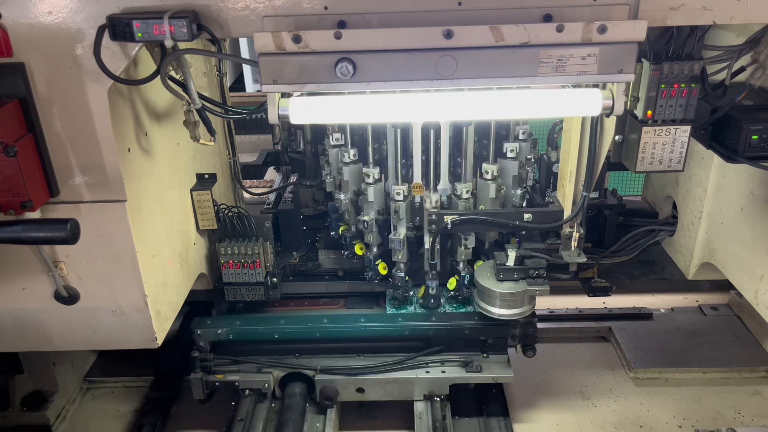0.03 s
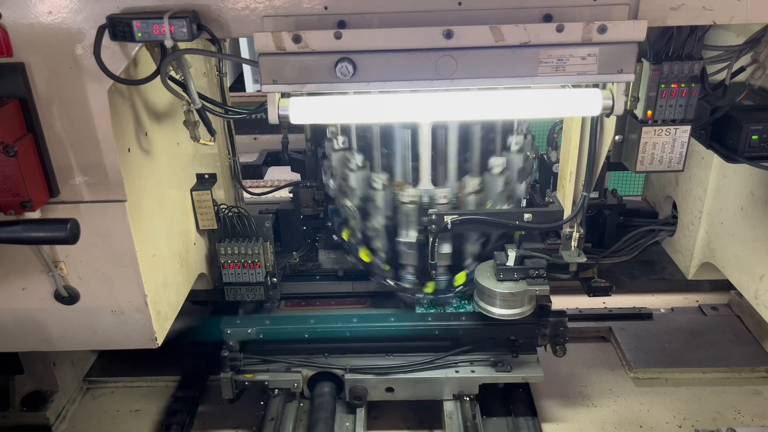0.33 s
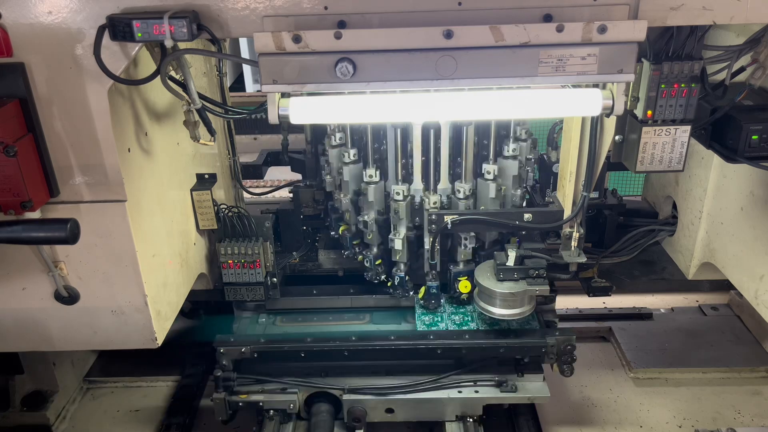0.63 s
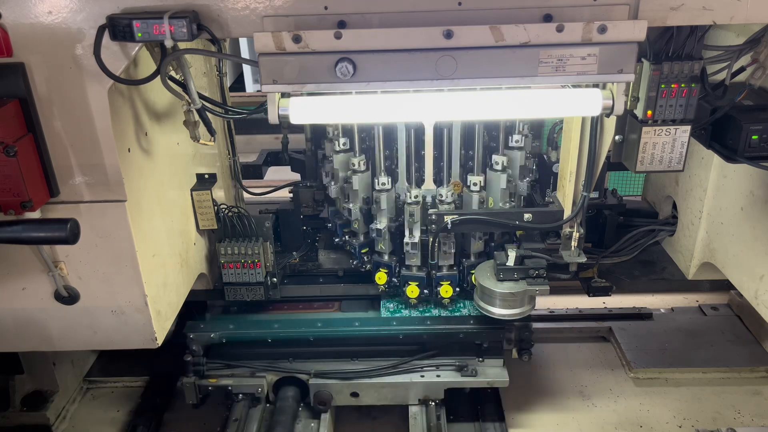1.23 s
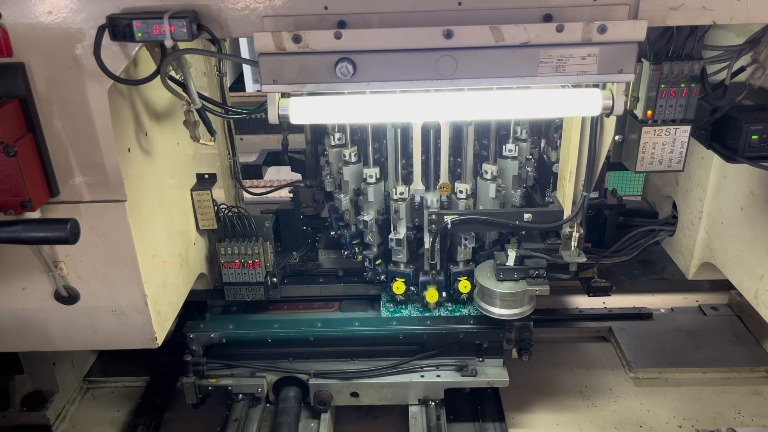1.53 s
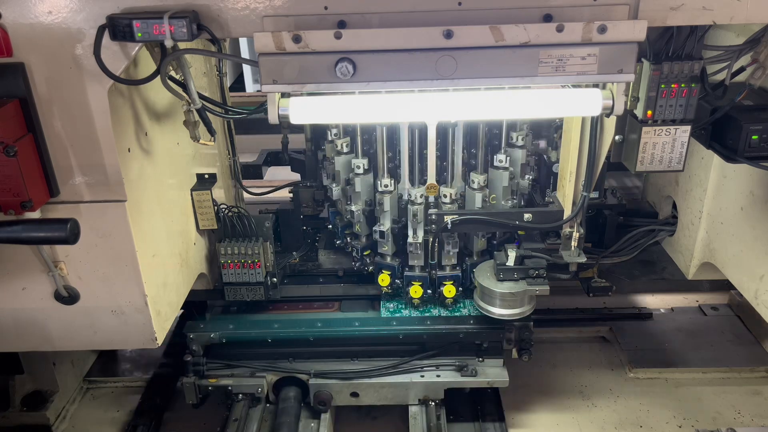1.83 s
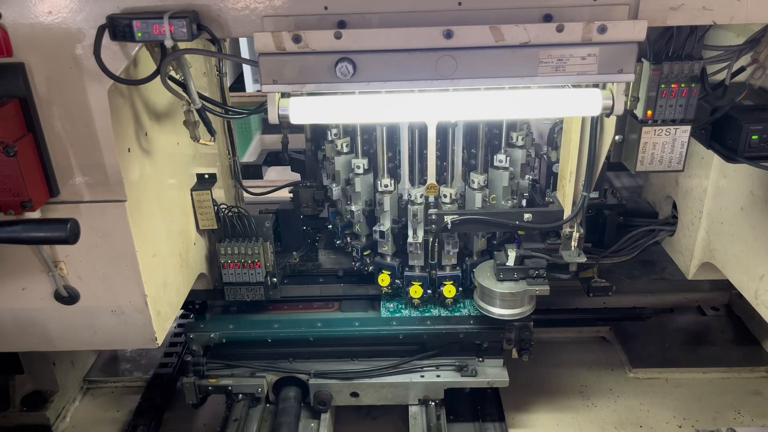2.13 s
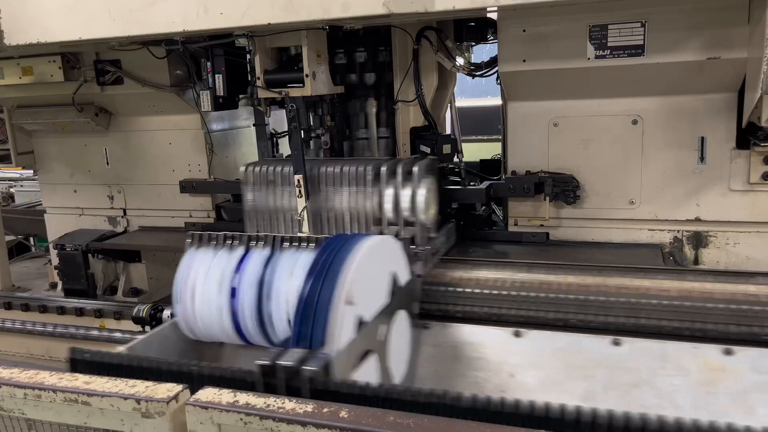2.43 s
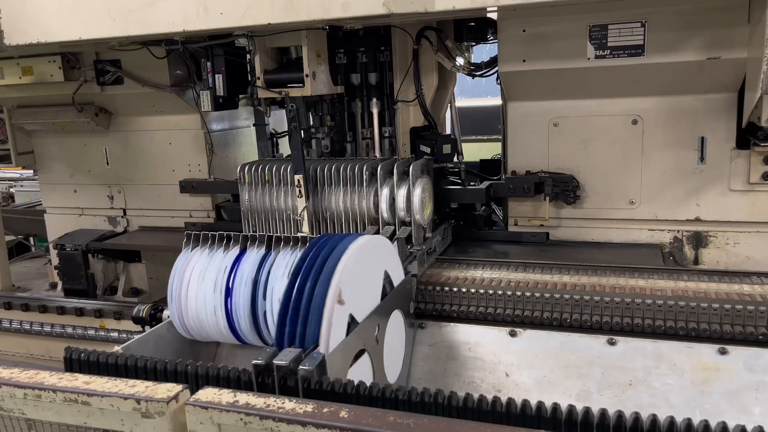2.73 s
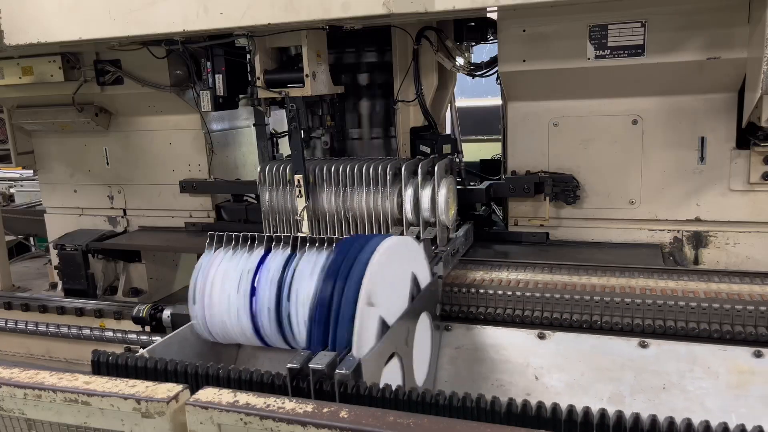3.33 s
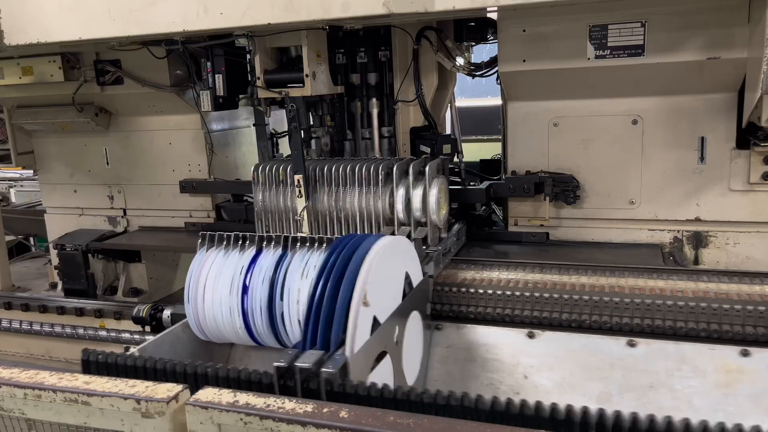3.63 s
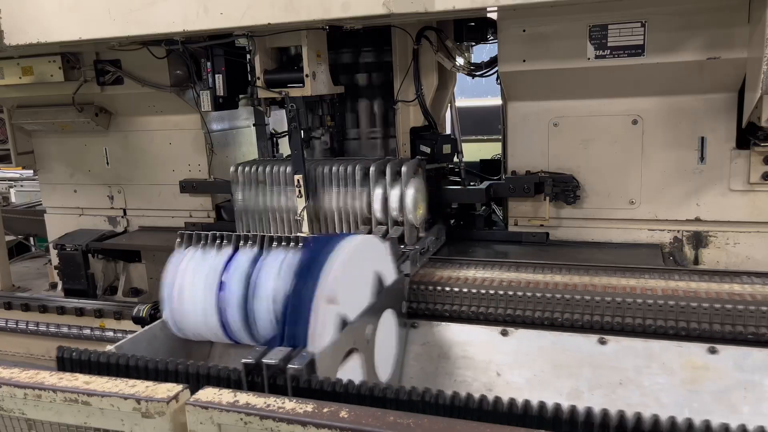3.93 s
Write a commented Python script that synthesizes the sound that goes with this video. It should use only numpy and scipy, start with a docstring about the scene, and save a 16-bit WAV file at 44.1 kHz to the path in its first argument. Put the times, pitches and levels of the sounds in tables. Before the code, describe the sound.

Rhythmic metallic clacking of a component placement machine, switching to louder knocks and ratchets.

```python
"""Clattering cams, clinks and dull thuds over fan noise: a turret pick-and-place machine, from the front.
The turret indexes about three times a second, its parts hitting stops and ringing the steel, then rests.
At 2.2 s the listener is abruptly on the loud feeder side: levers knock, tape ratchets clack and
the carriage motor whirs, over the hum of the main drive and rushing air."""
import sys
import numpy as np
from scipy import signal
from scipy.fft import rfft, irfft
from scipy.io import wavfile
from scipy.ndimage import uniform_filter1d

SR = 44100
rng = np.random.default_rng(int(sys.argv[2]) if len(sys.argv) > 2 else 0)


def wav_out(sig):
    """Save sig, one row per channel (or a flat mono array), as 16-bit PCM at SR to the path in sys.argv[1]."""
    wavfile.write(sys.argv[1], SR, np.round(np.clip(np.atleast_2d(sig).T, -1, 1) * 32767).astype(np.int16))


N = 176400
TIME_S = np.arange(N) / SR
CENTRE = np.array([[1], [0]])  # rows are mid, side until stereo()


def undb(db):
    """Decibels to gain."""
    return 10 ** (np.asarray(db) / 20)


def unit(x):
    """Scale to rms 1."""
    return x / np.sqrt(np.mean(x ** 2))


def drift(rate_hz):
    """Smooth random drift, spread near 1."""
    hold = int(SR / rate_hz)
    steps = np.repeat(rng.standard_normal(N // hold + 1), hold)
    return 1.35 * uniform_filter1d(uniform_filter1d(steps, hold), hold)[:N]


def on_bins(hz, values, size):
    """Interpolate onto FFT bins, log frequency axis."""
    return np.interp(np.log(np.arange(size // 2 + 1) * SR / size + 1), np.log(hz), values)


def convolve(x, response):
    """Apply an impulse response to each row."""
    return signal.fftconvolve(np.atleast_2d(x), response, axes=-1)[:, :N]


def colour(x, points, size=8192):
    """Minimum-phase filter of unit power through (f/Hz, level/dB) points."""
    gain = unit(undb(on_bins(*np.array(points).T, size)))
    cepstrum = irfft(np.log(gain))
    cepstrum[1:size // 2] *= 2
    cepstrum[size // 2 + 1:] = 0
    return convolve(x, irfft(np.exp(rfft(cepstrum)))[None])


def decay(t60_s):
    """Exponential decay, 1 s long."""
    return np.exp(-np.log(1000) * TIME_S[:SR] / t60_s)


def add(out, x, start_s):
    """Mix x in at start_s."""
    i = int(max(start_s, 0) * SR)
    out[..., i:i + x.shape[-1]] += x[..., :max(N - i, 0)]


def rotor(hz, waver, flutter_db):
    """Centred tone of an unsteady rotating part."""
    phase = 2 * np.pi * np.cumsum(hz * (1 + waver * drift(25.19))) / SR
    return CENTRE * np.sqrt(2) * np.sin(phase) * undb(flutter_db * drift(22))


def air(spectrum):
    """Steady fan and air noise, slight flutter."""
    return colour(rng.standard_normal((2, N)), spectrum) * undb(.5 * drift(25))


def steel_modes(spread_db):
    """Dense steel modes of unequal strength, 1 s long."""
    bands = np.repeat(rng.standard_normal(SR // 24), 24)[:SR // 2 + 1]
    strength = undb(spread_db * np.tanh(bands))
    return unit(irfft(rfft(rng.standard_normal((2, SR))) * strength))


def blows(table, attack_s, slide_db, crack_t60_s, tail_t60_s, modes_db, grain_db, lead_s=.04):
    """A part slides to its stop and hits: grainy crack, then housing modes shared by all blows."""
    out, housing = np.zeros((2, N)), steel_modes(modes_db)
    t = TIME_S[:SR] - lead_s
    after_s = np.maximum(t, 0)
    rise = 1 - np.exp(-after_s / attack_s)
    slide = undb(slide_db) * np.maximum(1 - np.abs(t) / lead_s, 0)
    crack, tail = (rise * np.exp(-np.log(1000) * after_s / t60) for t60 in (crack_t60_s, tail_t60_s))
    for start_s, db in table:
        grain = unit(undb(grain_db * drift(730)[:SR])) * rng.standard_normal((2, SR))
        steel = np.roll(housing, rng.integers(SR), axis=1)
        add(out, undb(db) * (grain * (slide + crack) + steel * tail), start_s - lead_s)
    return out


def rattle(per_s, spread_db, t60_s):
    """Loose links and reels tick at random."""
    ticks = (rng.random(N) < per_s / SR) * undb(spread_db * np.minimum(rng.standard_normal(N), 2))
    power = np.abs(convolve(ticks ** 2, decay(t60_s)[None] ** 2))
    return unit(np.sqrt(power) * rng.standard_normal((2, N)))


# fan tones: f/Hz, rel. level/dB
FAN_TONES = [(134.6, -48), (489.9, -48.5), (624.5, -47)]
# front air spectrum, with a deep filter notch at 8.5 kHz: f/Hz, rel. level/dB
FRONT_AIR = [(25, -24), (60, -7), (140, 2), (370, -9.5), (620, -7), (950, -16), (5000, -25.5), (7000, -31),
             (8500, -103.5), (10800, -70)]

def fans():
    """Fans drone and move air."""
    tones = sum(undb(db) * rotor(hz, waver=.0141, flutter_db=3) for hz, db in FAN_TONES)
    return tones + undb(-31.5) * air(FRONT_AIR)


def treble_hiss(centre_hz=10550, half_width_hz=520):
    """A narrow, faintly flickering high hiss."""
    lowpass = signal.butter(4, half_width_hz, fs=SR, output="sos")
    slow = signal.sosfilt(lowpass, rng.standard_normal((2, N)))
    phase = 2 * np.pi * centre_hz * TIME_S
    hiss = unit(slow[0] * np.sin(phase) + slow[1] * np.cos(phase))
    return CENTRE * hiss * undb(3 * drift(45))


# cam and nozzle strikes: t/s, rel. level/dB
CAM_HITS = [(.026, -29), (.075, -25), (.155, -29.5), (.345, -26), (.372, -27.5), (.417, -25), (.648, -34.5),
            (.693, -27.5), (.934, -31), (1.058, -32), (1.101, -28.5), (1.148, -24), (1.366, -34),
            (1.442, -26), (1.543, -28), (1.564, -28)]

def cams():
    """Turret cams and nozzles hit their stops."""
    return blows(CAM_HITS, attack_s=.0036, slide_db=-6, crack_t60_s=.11, tail_t60_s=.51,
                 modes_db=7.5, grain_db=-2)


# cover resonances: f/Hz, width/Hz, rel. level/dB
PANEL_MODES = [(1440, 350, -7.5), (1885, 134, 7), (2273, 36, -6)]

def panels(x, ring_db):
    """Sheet-steel covers add a metallic ring."""
    ringing = sum(undb(db) * signal.lfilter(*signal.iirpeak(hz, hz / width_hz, fs=SR), x)
                  for hz, width_hz, db in PANEL_MODES)
    return x + undb(ring_db) * ringing


# ringing turret parts: t/s, f/Hz, rel. level/dB
CLINKS = [(.077, 1944, -23), (.417, 718, -25), (.421, 1700, -24), (.697, 491, -26.5), (.724, 580, -27),
          (0.937, 1550, -29), (1.1, 1510, -25), (1.148, 3480, -37), (1.37, 1150, -24.5)]

def clinks(mode_ratio=1.052, t60_s=.15):
    """Each part rings a close pair of modes."""
    out = np.zeros((2, N))
    for start_s, hz, db in CLINKS:
        phase = 2 * np.pi * hz * TIME_S[:SR]
        offset = 2 * np.pi * rng.random((2, 2, 1))
        pair = np.sin(phase + offset[0]) + .5 * np.sin(phase * mode_ratio + offset[1])
        add(out, undb(db) * pair * decay(t60_s), start_s)
    return out


# starts and stops: t/s, rel. level/dB
THUDS = [(.095, -29.5), (.17, -31), (.28, -27.5), (.417, -25.5), (.697, -30), (.76, -24.5), (.935, -28),
         (1.15, -22), (1.44, -24), (1.595, -26.5), (1.65, -29.5)]
# thud spectrum: f/Hz, rel. level/dB
THUD_SPECTRUM = [(35, -17), (70, -14), (150, -2.5), (330, -2), (600, -10.5), (2500, -44.5)]

def thuds():
    """Turret and board table start and stop with dull thuds."""
    jolts = blows(THUDS, attack_s=.004, slide_db=-7, crack_t60_s=.06, tail_t60_s=.45,
                  modes_db=2, grain_db=2)
    return colour(jolts, THUD_SPECTRUM)


def turret_swing(start_s=.745, end_s=.942, ramp_s=.04):
    """Nozzle heads rattle densely during one long swing."""
    turning = np.clip(np.minimum(TIME_S - start_s, end_s - TIME_S) / ramp_s + 1, 0, 1)
    return turning * rattle(per_s=320, spread_db=3, t60_s=.06)


# clatter spectrum, with a deep filter notch at 8.5 kHz: f/Hz, rel. level/dB
TURRET_SPECTRUM = [(200, 4), (600, 3), (1400, 5), (1950, -1.5), (2600, -2), (5000, -6.5), (7000, -10),
                   (8500, -79), (10500, -26)]

def front():
    """The turret clatters, clinks and thuds over the fans."""
    clatter = colour(undb(-2) * cams() + undb(-33) * turret_swing(), TURRET_SPECTRUM)
    turret = panels(clatter, ring_db=-4) + clinks() + undb(-2) * thuds()
    return turret + fans() + undb(-45.5) * treble_hiss()


# feeder air spectrum, with a deep filter notch at 8.5 kHz: f/Hz, rel. level/dB
FEEDER_AIR = [(25, -55), (52, 3), (80, -4), (190, 5), (400, -3), (1200, -6), (4500, -15.5), (7000, -20),
              (8500, -121), (11000, -104.5)]

def feeder_air(start_s, full_s=2.28):
    """Air noise and hiss swell quickly, then hold."""
    swell = undb(np.interp(TIME_S, [start_s, full_s], [-8, 0]))
    return swell * (undb(-19.5) * air(FEEDER_AIR) + undb(-41) * treble_hiss())


def drive_hum():
    """The main drive hums, slightly unsteady."""
    return rotor(hz=49.1, waver=.016, flutter_db=-6.5)


# ratchet and cutter strikes: t/s, rel. level/dB
CLACKS = [(2.196, -30.5), (2.255, -23.5), (2.281, -16.5), (2.475, -19), (2.62, -14.5), (2.799, -15.5),
          (2.976, -14.5), (3.174, -20.5), (3.338, -18), (3.371, -18.5), (3.82, -18.5), (3.852, -17.5),
          (3.95, -15.5)]

def clacks():
    """Feeder ratchets and tape cutter strike sharply."""
    return blows(CLACKS, attack_s=.00053, slide_db=-6.5, crack_t60_s=.066, tail_t60_s=.31,
                 modes_db=16, grain_db=-1.5)


# carriage moves: t/s, length/s, first f/Hz, last f/Hz, rel. level/dB
CARRIAGE_MOVES = [(2.212, 0.21, 208.6, 188.7, -24), (2.909, 0.41, 210.3, 189.3, -31.5),
                  (3.46, 0.23, 269.4, 317, -26.5), (3.665, 0.208, 226, 204.5, -23.5),
                  (3.837, 0.16, 212, 238, -28)]

def carriage():
    """The carriage motor whirs in short gliding moves."""
    out = np.zeros((2, N))
    for start_s, length_s, first_hz, last_hz, db in CARRIAGE_MOVES:
        progress = np.clip((TIME_S - start_s) / length_s, 0, 1)
        arch = np.sqrt(4 * progress * (1 - progress))
        hz = first_hz + (last_hz - first_hz) * progress
        out += undb(db) * arch * rotor(hz, waver=.00824, flutter_db=3)
    return out


# feed levers hit their stops: t/s, rel. level/dB, f/Hz
KNOCKS = [(2.272, -8.5, 790), (2.463, -6, 680), (2.58, -9, 730), (2.616, -11.5, 1000), (2.755, -12, 720),
          (2.789, -16, 1020), (2.965, -11.5, 642), (3.323, -8.5, 720), (3.498, -14.5, 950),
          (3.665, -8, 740), (3.808, -9.5, 940), (3.845, -12.5, 900), (3.935, -7.5, 676)]
# lever modes: f/Hz, rel. level/dB, t60/s
LEVER_MODES = [(469, -9, 0.31), (668.4, -1.5, 0.059), (900, -0.5, 0.043), (1027, -9, 0.099)]

def levers(detune=.025, focus_octaves=.3, travel_s=.012, echo_db=-8, echo_t60_s=.3):
    """Each lever rings the modes near its own pitch; the machine cavity echoes them."""
    out, mid_side = np.zeros((2, N)), np.array([[1], [.5]])
    top_hz = LEVER_MODES[-1][0]
    for start_s, db, pitch_hz in KNOCKS:
        for hz, mode_db, t60_s in LEVER_MODES:
            tuned_hz = hz * (1 + detune * rng.standard_normal())
            wave = np.sin(2 * np.pi * (tuned_hz * TIME_S[:SR] + rng.random((2, 1))))
            strength = undb(db + mode_db) / np.hypot(1, np.log2(hz / pitch_hz) / focus_octaves)
            envelope = decay(t60_s) - decay(.0041)
            lag_s = travel_s * (np.sqrt(top_hz / hz) - 1)  # low bending waves arrive later
            add(out, mid_side * strength * envelope * wave, start_s + lag_s)
    cavity = unit(rng.standard_normal((2, SR)) * decay(echo_t60_s)) / np.sqrt(SR)
    return out + undb(echo_db) * convolve(out, cavity)


# frame spectrum: f/Hz, rel. level/dB
FRAME_SPECTRUM = [(40, -27.5), (120, -6.5), (200, -3.5), (320, -6), (450, -12), (2000, -46)]

def frame(lag_s=.004):
    """Each lever knock shakes the frame."""
    hits = [(start_s + lag_s, db) for start_s, db, _ in KNOCKS]
    shake = blows(hits, attack_s=.008, slide_db=-26, crack_t60_s=.1, tail_t60_s=.6,
                  modes_db=2, grain_db=2)
    return colour(shake, FRAME_SPECTRUM)


# tape advances: centre t/s, rel. level/dB
TAPE_FEEDS = [(2.325, -19), (2.675, -20.5), (2.855, -21.5), (3.03, -22.5), (3.18, -26), (3.37, -36),
              (3.538, -19), (3.71, -19.5), (3.86, -34), (3.99, -20)]

def ratchets(length_s=.096):
    """Tape advances tooth by tooth: short runs of ticks that swell and die."""
    advance = sum(undb(db) * np.exp(-(2 * (TIME_S - centre_s) / length_s) ** 2)
                  for centre_s, db in TAPE_FEEDS)
    return advance * rattle(per_s=400, spread_db=3.5, t60_s=.018)


# clack and tick spectrum: f/Hz, rel. level/dB
CLACK_SPECTRUM = [(150, -8.5), (600, 4.5), (1950, -1), (2600, -1.5), (5000, -5.5), (7000, -10), (8500, -21),
                  (10500, -11.5)]

def feeders():
    """Ratchets clack and rattle, levers knock and shake the frame."""
    clatter = colour(clacks() + ratchets(), CLACK_SPECTRUM)
    return panels(clatter, ring_db=-11.5) + undb(3) * levers() + undb(-10.5) * frame()


# stereo image: f/Hz, side minus mid/dB, left minus right/dB
STEREO_IMAGE = [(100, -24, 1), (310, -8, 1.5), (1100, -1, -0.2), (2040, -4.5, 1), (3830, -4.5, 4.5),
                (6200, -1, 1.4), (10400, 2.5, 1)]

def stereo(mid_side):
    """Mid/side to left/right: narrow bass, wide treble, leaning slightly left."""
    hz, side_db, lean_db = np.array(STEREO_IMAGE).T
    width = undb(on_bins(hz, side_db, 2 * N))
    lean = undb(on_bins(hz, lean_db, 2 * N) / 2)
    mid, side = rfft(mid_side, 2 * N)
    left, right = (mid + width * side) * lean, (mid - width * side) / lean
    return irfft(np.array([left, right]) / np.hypot(1, width))[:, :N]


def scene():
    """The front of the machine, then its feeder side."""
    switch_s, crossfade_s = 2.195, .0013
    blend = np.clip((TIME_S - switch_s) / crossfade_s, 0, 1)
    front_side = front()
    feeder_side = feeder_air(switch_s) + undb(-32.5) * drive_hum() + carriage() + feeders()
    return stereo((1 - blend) * front_side + blend * feeder_side)


def record(dry):
    """Soft-clip the peaks, low-pass at 10850 Hz."""
    lowpass = signal.ellip(8, .2, 80, 10850, fs=SR, output="sos")
    return signal.sosfilt(lowpass, 1.3 * np.tanh(dry / 1.3))


dry = scene()
out = record(dry)
wav_out(out)
```